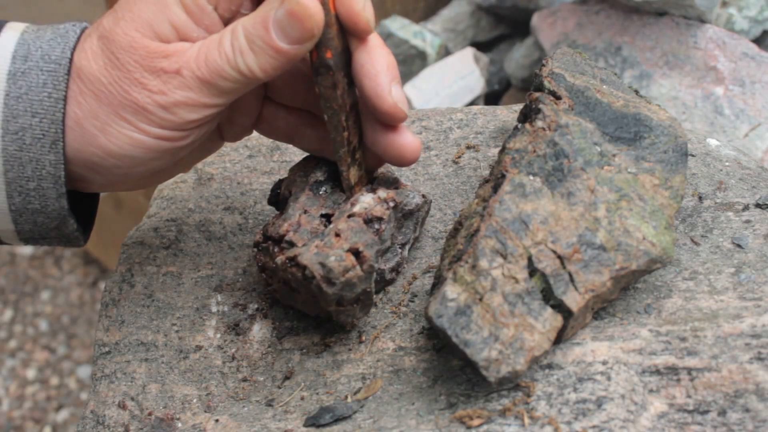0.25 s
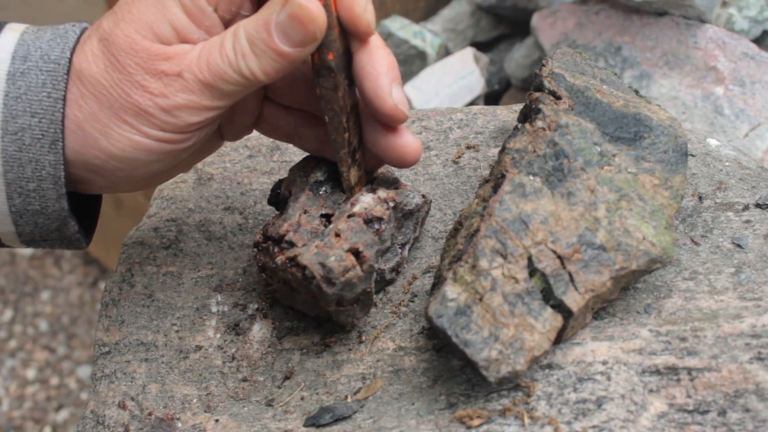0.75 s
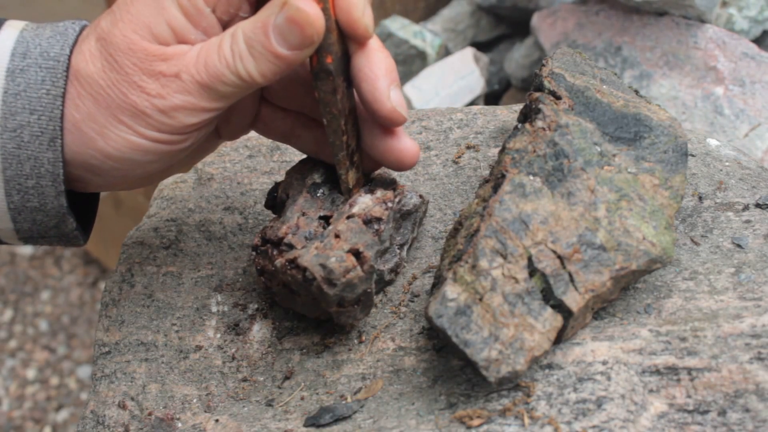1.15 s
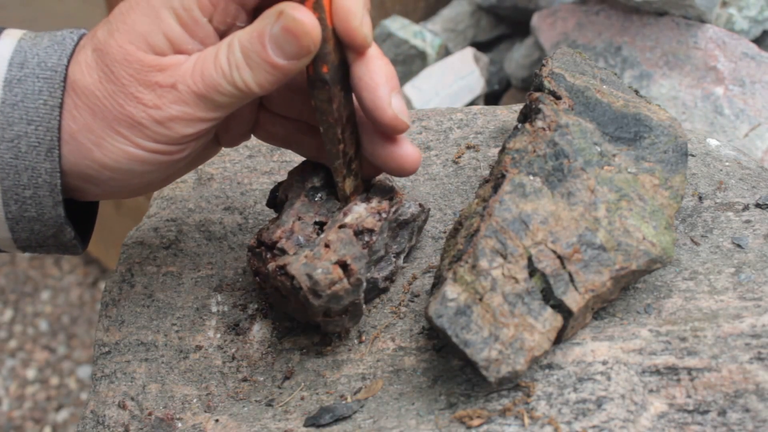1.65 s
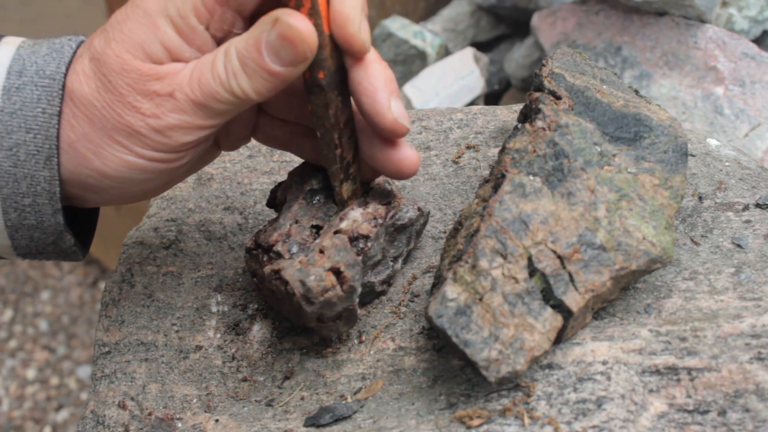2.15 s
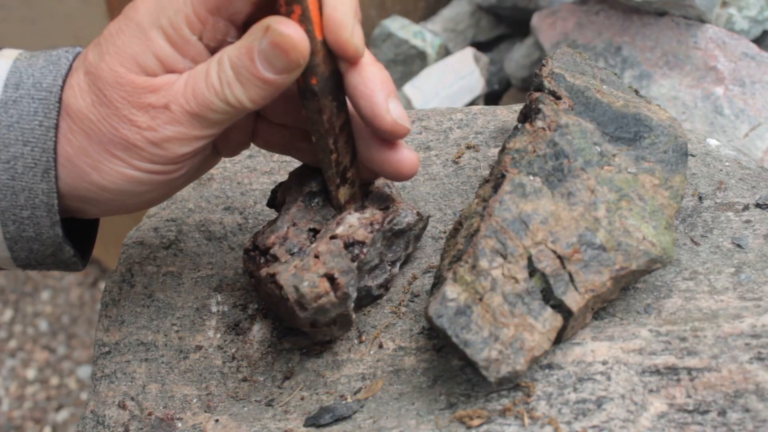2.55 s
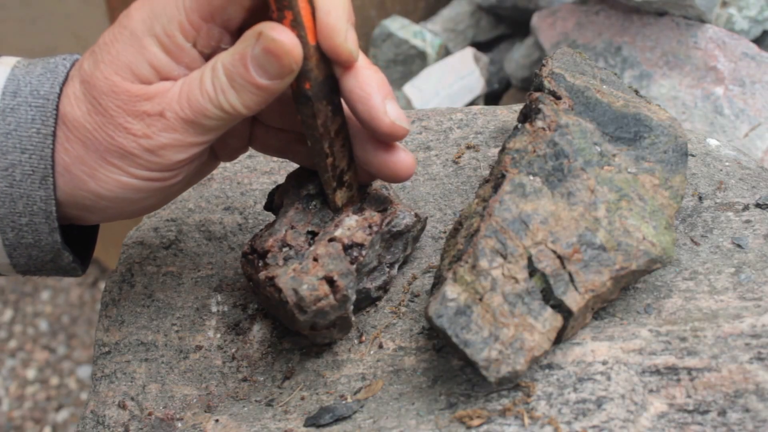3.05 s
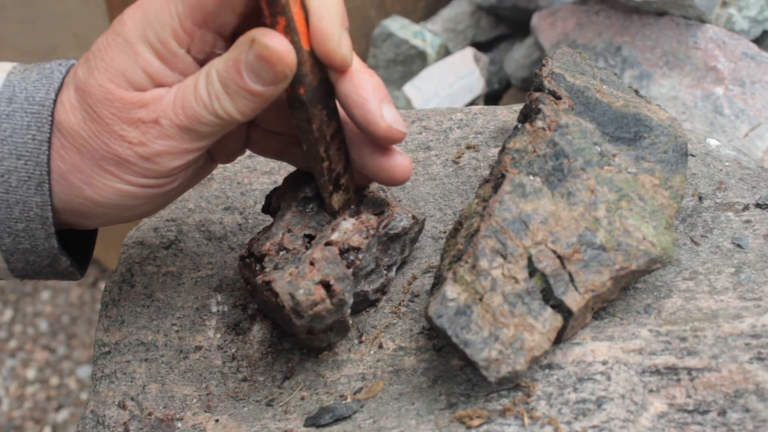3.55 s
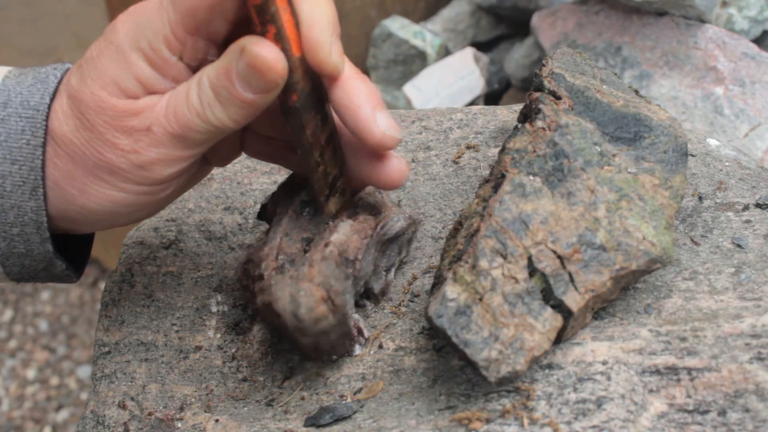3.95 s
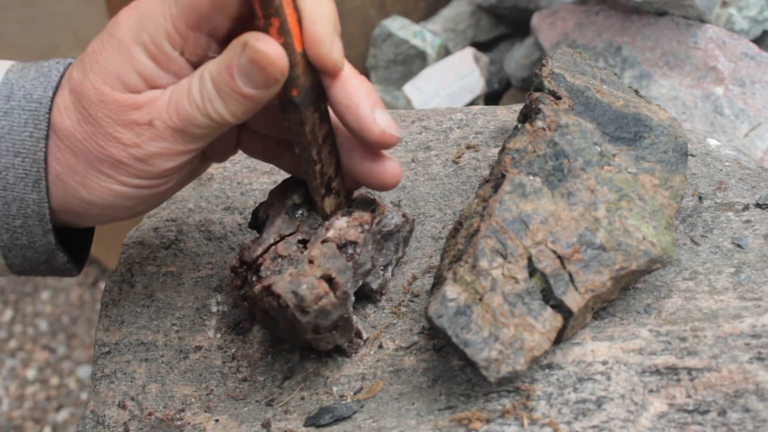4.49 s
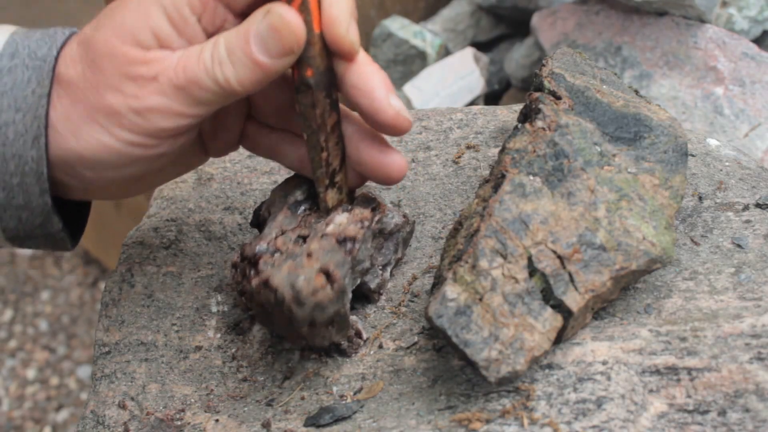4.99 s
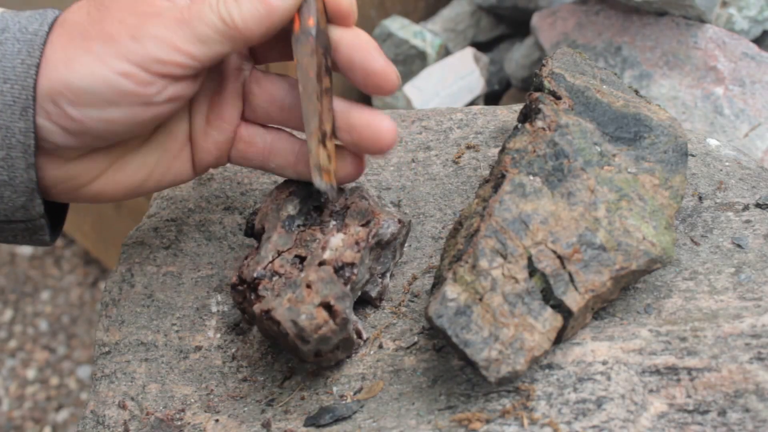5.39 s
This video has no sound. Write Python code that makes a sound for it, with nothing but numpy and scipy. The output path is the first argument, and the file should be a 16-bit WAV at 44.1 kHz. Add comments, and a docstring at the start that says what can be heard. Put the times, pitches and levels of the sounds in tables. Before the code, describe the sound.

Thirteen steady chisel blows crunch into a stone lump, sharp and clipped with short ringing, then the chisel scrapes free and the lump clacks down.

```python
"""Outdoors in a yard, close by: a hammer taps a hand-held steel chisel into a lump of rock on a stone slab.
Thirteen blows each crush stone (bursts of coloured noise and a knock) and ring steel and slab (dying sines).
The click and ring return as near echoes and a yard tail; the blows clip the level and grow mostly harder,
so gain control ducks the wavering noise of the open air further.
At the end the chisel squeaks out of its notch, the lump knocks on the slab and grit scrapes."""
import sys
import numpy as np
from scipy import signal
from scipy.fft import rfft, irfft
from scipy.io import wavfile
from scipy.ndimage import uniform_filter1d, minimum_filter1d, map_coordinates

SR = 44100
rng = np.random.default_rng(int(sys.argv[2]) if len(sys.argv) > 2 else 0)


def unload_audio(sound):
    """Save the sound as a 16-bit wav file, at the path given as the first command line argument."""
    columns = np.transpose(np.atleast_2d(sound))
    # keep every value between -1 and 1, then stretch to whole-number steps
    steps = np.round(np.clip(columns, -1, 1) * 32767)
    wavfile.write(sys.argv[1], SR, steps.astype(np.int16))


N = 248056
TIME = np.arange(N) / SR  # s, the whole scene
AGE = np.arange(SR // 2) / SR  # s since a sound began


def amp(db):
    """Decibels to gain."""
    return 10 ** (np.asarray(db) / 20)


def evened(x):
    """Scales to rms 1."""
    return x / np.sqrt(np.mean(x ** 2) + 1e-20)


def read(points, hz):
    """Reads a table along a log-frequency axis."""
    f, value = np.transpose(points)
    return np.interp(np.log(hz + 1), np.log(f + 1), value)


def add(mix, s, sound):
    """Mixes a sound in at time s."""
    part = mix[round(s * SR):][:len(sound)]
    part += sound[:len(part)]


def noise(colour_db, size):
    """Noise of rms 1 whose spectrum is the function colour_db of frequency."""
    hz = np.fft.rfftfreq(size, 1 / SR)
    spectrum = rfft(rng.standard_normal(size)) * amp(colour_db(hz))
    return evened(irfft(spectrum, size))


def band_noise(centre_hz, octaves, size=len(AGE)):
    """Noise of rms 1 in a band with soft shoulders, half a second unless a size is given."""
    def shoulders_db(hz):
        return -20 * np.log10(1 + (np.log2((hz + 1) / centre_hz) / octaves) ** 4)
    return noise(shoulders_db, size)


def hump(hz, centre_hz, octaves):
    """A bell, 1 at its centre, on a log-frequency axis."""
    return np.exp(-(np.log2((hz + 1) / centre_hz) / octaves) ** 2)


def swell(s, half_s):
    """A smooth rise and fall, 1 at time s."""
    return np.exp(-((TIME - s) / half_s) ** 2)


def air(level_db=-44, waver_db=1.06, waver_hz=7):
    """A steady outdoor wash: coloured noise whose level wavers a little and slowly."""
    # spectrum of the open air: f/Hz, relative level/dB
    air_colour = [(15, -36), (25, -8), (114, 2), (145, -6.5), (285, -8), (416, -8.5), (451, -7),
                  (818, -6.5), (962, -5.5), (1100, -8.5), (3820, -15), (16000, -36.5)]
    waver = noise(lambda hz: -20 * np.log10(1 + (hz / waver_hz) ** 2), N)
    wash = noise(lambda hz: read(air_colour, hz), N)
    return amp(level_db + waver_db * waver) * wash


def rustles(octaves=.45):
    """Soft swishes of skin and cloth: bands of noise that rise and fall smoothly."""
    # hand and sleeve shift: t/s at the loudest, level/dB, half length/s, centre f/Hz
    shifts = [(0.71, -47.5, .09, 3000), (5.314, -49, 0.35, 1570)]
    out = np.zeros(N)
    for s, db, half_s, centre_hz in shifts:
        out += amp(db) * swell(s, half_s) * band_noise(centre_hz, octaves, size=N)
    return out


def yard(x, build_s=0.0077, rubble_t60=0.16):
    """Scattered reflections: a short bright spray from the rubble, then the yard dying away band by band."""
    # energy of the yard's tail: f/Hz, level/dB
    yard_colour = [(100, -39), (400, -48.5), (1200, -52.5), (1800, -39.5), (2800, -34.5), (4000, -44.5),
                   (5500, -47), (7000, -54), (9500, -45), (11000, -64), (15500, -63.5)]
    # how long the yard takes to die by 60 dB: f/Hz, t60/s
    yard_decay = [(100, 0.23), (1000, 0.076), (3000, 0.74), (5000, 0.86), (8000, 0.1), (15000, 0.19)]
    # loose stones all round scatter the click early and brightly: f/Hz, level/dB
    rubble_colour = [(100, -52), (1200, -48.5), (2000, -36.5), (3000, -34.5), (5500, -39.5), (9500, -48),
                     (11500, -56), (15500, -58)]
    hz, t, bands = signal.stft(rng.standard_normal(SR), SR, nperseg=256)
    yard_t60 = read(yard_decay, hz)[:, None]
    far = amp(read(yard_colour, hz)[:, None] - 60 * t / yard_t60) / np.sqrt(yard_t60)
    near = amp(read(rubble_colour, hz)[:, None] - 60 * t / rubble_t60) / np.sqrt(rubble_t60)
    # with the t60 roots above, a long tail carries no more energy than a short one of equal level
    bands = bands * np.hypot(near, far) * np.sqrt(2 * np.log(1000) / SR)
    build_up = 1 - np.exp(-np.arange(SR) / SR / build_s)
    tail = signal.istft(bands, SR, nperseg=256)[1][:SR] * build_up
    return signal.fftconvolve(x, tail)[:N]


def near_echoes(x, low_hz=600, dull_hz=4800):
    """Rocks and walls close by throw back single, duller copies."""
    # near surfaces: delay/s, level/dB
    surfaces = [(.0103, -23), (.0111, -30), (.0194, -37), (.0250, -43), (.0368, -39), (.0490, -40)]
    taps = np.zeros(len(AGE))
    for delay, db in surfaces:
        taps[round(delay * SR)] = amp(db)
    band = signal.butter(2, [low_hz, dull_hz], "band", fs=SR, output="sos")
    return signal.fftconvolve(signal.sosfilt(band, x), taps)[:N]


def scrape(grain_db=5, attack_s=0.01):
    """Grit rolls between steel and stone in clumps of tiny grains; each shift starts quickly and dies away."""
    # the tip and the lump grate on grit: t/s at the loudest, level/dB, decay/s
    shifts = [(5.11, -46, .025), (5.502, -36, 0.036), (5.586, -33, 0.017)]
    # spectrum of the grit: f/Hz, relative level/dB per Hz
    grit_colour = [(60, -2.5), (300, 10), (700, -3), (2500, 1), (5000, -7), (9000, -17), (16000, -18)]
    clumps = evened(uniform_filter1d(rng.standard_normal(N), size=70))
    level = np.zeros(N)
    for s, db, decay_s in shifts:
        level += amp(db) * np.exp(-np.maximum((s - TIME) / attack_s, (TIME - s) / decay_s))
    grit = noise(lambda hz: read(grit_colour, hz), N)
    return level * grit * evened(amp(grain_db * clumps))


def squeak(start=5.066, length=0.092, width_hz=55, gain_db=18, glide=0.03):
    """The tip slides out of its notch; uneven slips excite narrow resonances that sink a little in pitch."""
    # the tip dragged over stone: f/Hz, level/dB before the gain
    resonances = [(2573, -61.5), (4425, -57), (6535, -65), (7790, -68), (11946, -64), (12339, -59)]
    size = int(length * SR)
    lines = np.zeros(size)
    for f, db in resonances:
        lines += amp(db) * noise(lambda hz: -20 * np.log10(1 + ((hz - f) / width_hz) ** 2), size)
    # reading ever more slowly makes the pitch sink
    place = np.cumsum(1 + glide * np.linspace(.5, -.5, size))
    sinking = map_coordinates(lines, [place], order=5)
    out = np.zeros(N)
    add(out, start, amp(gain_db) * sinking * np.hanning(size))
    return out


def knocks(octaves=1.02, clack_s=0.0036, bump_db=-9, bump_hz=298, bump_octaves=0.31, bump_s=0.0046):
    """Stone meets stone: a short clack over a dull bump of the slab, both dying bands of noise."""
    # the loosened lump drops back on the slab and rocks: t/s, level/dB, centre f/Hz
    drops = [(5.4954, -10, 3930), (5.5156, -25, 2220), (5.5619, -29, 5460)]
    out = np.zeros(N)
    for s, db, centre_hz in drops:
        clack = band_noise(centre_hz, octaves) * np.exp(-AGE / clack_s)
        bump = amp(bump_db) * band_noise(bump_hz, bump_octaves) * np.exp(-AGE / bump_s)
        add(out, s, amp(db) * (clack + bump))
    return out


def chips(centre_hz=10500, octaves=1.0, decay_s=0.00095):
    """Tiny chips of stone click: dry, bright snaps of noise that die at once."""
    # clicks: t/s, level/dB
    clicks = [(0.8107, -31.5), (1.0378, -35), (3.481, -21.5), (5.169, -28), (5.441, -22)]
    out = np.zeros(N)
    for s, db in clicks:
        add(out, s, amp(db) * band_noise(centre_hz, octaves) * np.exp(-AGE / decay_s))
    return out


def rebounds(centre_hz=2300, octaves=.6, tick_db=-9, tick_octaves=1.5, touch_s=.001):
    """Light, dry second touches of the hammer: a small knock with a thin, wide tick."""
    # the hammer falls back on the chisel: t/s, level/dB
    touches = [(1.6620, -8.5), (2.685, -6), (3.0300, 1), (3.3787, -4.5)]
    out = np.zeros(N)
    pulse = AGE / touch_s * np.exp(1 - AGE / touch_s)
    for s, db in touches:
        touch = band_noise(centre_hz, octaves) + amp(tick_db) * band_noise(centre_hz, tick_octaves)
        add(out, s, amp(db) * touch * pulse)
    return out


def ring(modes, shift=1):
    """A struck body: dying sines in random phase, one a mode; shift scales their pitch."""
    hz, db, t60 = np.transpose(modes)[:, :, None]
    sines = np.sin(2 * np.pi * (shift * hz * AGE + rng.random(hz.shape)))
    return (amp(db - 60 * AGE / t60) * sines).sum(0)


def crush(knock_hz, body_db, bright_db, crack_db=3, grind_db=-2, knock_db=4, body_base_db=-12,
          crumble_db=-13, swell_s=0.0014, contact_s=0.0034):
    """The tip bites: a bright crack, then stone grinds and knocks until the contact ends and it crumbles."""
    # spectrum of stone being crushed: f/Hz, relative level/dB per Hz
    grind_colour = [(30, -30.5), (300, -26.5), (750, -23), (1500, -3), (2500, 6), (4000, 5.5), (6500, -9),
                    (9000, -9), (12000, -24), (16000, -16.5)]
    contact = 1 / (1 + (AGE / contact_s) ** 10)
    crumble = amp(crumble_db) * np.exp(-AGE / 0.0088)
    crack = noise(lambda hz: 50 * hump(hz, 5800, 1.5), len(AGE)) * np.exp(-AGE / 0.0013)
    grind = noise(lambda hz: read(grind_colour, hz), len(AGE)) * (contact + crumble)
    body = noise(lambda hz: 50 * hump(hz, 1700, 2.0), len(AGE)) * (contact + crumble)
    knock = np.sin(2 * np.pi * knock_hz * AGE) * contact * (1 - np.exp(-AGE / swell_s))
    bite = amp(crack_db + bright_db) * crack + amp(grind_db) * grind
    return bite + amp(body_base_db + body_db) * body + amp(knock_db) * knock


def hammering(bright_db=3.5, body_db=0, push_s=0.00038, boom_db=7, sing_db=0, click_db=42,
              ring_send_db=-3, stone_send_db=-6, rise_s=.00008):
    """Blows crush rock and ring steel and slab; returns the direct sound and what spreads into the yard."""
    # one row a blow: t/s, force/dB, knock of the rock f/Hz, then relative to the force:
    # chisel ring/dB, sideways ring/dB, slab thud/dB, low push/dB
    blows = [(0.4463, -3.5, 1966, -9, -27.5, -16, -20), (0.9067, 6, 2017, 0.5, -3, -13.5, -21.5),
             (1.2741, 7, 2940, -3, -11.5, -9, -25.5), (1.6308, 8.5, 2448, -19.5, -15.5, -7.5, -13.5),
             (1.9812, 8, 2472, -13.5, -22.5, -9, -10), (2.318, 11, 2467, -13.5, -13, -17.5, -6.5),
             (2.6599, 13, 2449, -12, -12.5, -17.5, -8.5), (2.9938, 14.5, 3843, -6.5, -27.5, -18.5, -19),
             (3.331, 16, 2299, -3.5, -31, -20.5, -13.5), (3.6887, 17.5, 2550, -6, -22.5, -24, -23.5),
             (4.0536, 17, 2501, -6.5, -8.5, -27, -29.5), (4.4117, 16.5, 2507, -18.5, -30.5, -20, -26.5),
             (4.7745, 16.5, 2448, -3.5, -22.5, -15, -27.5)]
    # modes of each struck body: f/Hz, relative level/dB, t60/s
    # the chisel
    chisel_modes = [(5033, 0, .056), (6600, -28, .04), (9250, -35, .08), (12100, -38, .07),
                    (15570, -28, .05)]
    # the chisel's ways of bending that the grip damps quickly
    side_modes = [(3836, 0, 0.034), (5070, -12.5, 0.023)]
    # a thin trace of the chisel's ring that lingers
    sing_modes = [(5033, -50, 1.0)]
    # the stone slab
    slab_modes = [(429, -7, .068), (345, -20, .04)]
    # the heavy support under the slab, booming faintly
    base_modes = [(63, -64.5, 0.64), (91, -56, 0.39), (117, -62, 0.14)]
    # the lump of rock
    rock_modes = [(1450, -16, .007), (1900, -10, .008), (2680, -13, .011), (3000, -11, .009),
                  (4150, -10, .008), (4600, -13, .007)]
    # the harder the blow, the more of it goes into the crack and the support, the less into the rock's body
    usual_force_db, bright_per_db, body_per_db, support_per_db = 12, 1.04, -0.91, 0.23
    direct, sent = np.zeros(N), np.zeros(N)
    rise = 1 - np.exp(-AGE / rise_s)
    push = AGE / push_s * np.exp(1 - AGE / push_s)  # the slab gives way once under the blow
    for s, force_db, knock_hz, ring_db, side_db, thud_db, push_db in blows:
        harder_db = force_db - usual_force_db
        seat = rng.uniform(.95, 1.05)  # the lump sits a little differently under every blow
        crushed = crush(knock_hz, body_db + body_per_db * harder_db, bright_db + bright_per_db * harder_db)
        stone = crushed + ring(rock_modes, seat)
        steel = amp(ring_db) * ring(chisel_modes)
        sides = amp(side_db) * ring(side_modes)
        sing = amp(sing_db + ring_db / 2) * ring(sing_modes)
        slab = amp(thud_db) * ring(slab_modes) + amp(push_db) * push
        support = amp(boom_db + support_per_db * harder_db) * ring(base_modes, seat)
        add(direct, s, amp(force_db) * rise * (stone + steel + sides + sing + slab + support))
        add(sent, s, amp(force_db) * (amp(ring_send_db) * steel + amp(stone_send_db) * stone))
        add(sent, s, amp([force_db + click_db]))  # click of steel on steel, one sample long
    return direct, sent


def gain_control(x, ceiling_db=-3, attack_s=.006, hold_s=0.25, recover_db_per_s=42):
    """Turns down by what passes the ceiling, too late for the crack itself; holds, then comes back up."""
    power = uniform_filter1d(x[0] ** 2, size=221, origin=110)  # mean over the last 5 ms
    over_db = np.maximum(10 * np.log10(abs(power) + 1e-12) - ceiling_db, 0)
    half = int(hold_s * SR / 2)
    held_db = -minimum_filter1d(-over_db, 2 * half + 1, origin=half)
    # a running maximum on a rising ramp lets the reduction fall no faster than the ramp
    recovery_db = recover_db_per_s * TIME
    down_db = np.maximum.accumulate(held_db + recovery_db) - recovery_db
    lag = np.exp(-1 / (attack_s * SR))
    return x * amp(-signal.lfilter([1 - lag], [1, -lag], down_db))


def scene():
    """Blows, small stone sounds, their echoes and the open air."""
    direct, sent = hammering()
    small = rebounds() + chips() + knocks() + squeak() + scrape()
    reflected = near_echoes(direct + small) + yard(sent + small)
    return (direct + small + reflected + rustles() + air())[None]


def record(dry, low_cut_hz=42, hiss_db=-81, edge_hz=15950):
    """Gain control ducks the air, hiss joins, peaks clip; then a gentle low cut, a band limit and full scale."""
    levelled = gain_control(dry) + amp(hiss_db) * rng.standard_normal(N)
    low_cut = signal.butter(1, low_cut_hz, "high", fs=SR, output="sos")
    clipped = signal.sosfilt(low_cut, np.clip(levelled, -1, 1))
    band_limit = signal.firwin(255, edge_hz, window=("kaiser", 7), fs=SR)
    limited = signal.oaconvolve(clipped, band_limit[None], "same")
    return np.clip(limited, -1, 1)


dry = scene()
out = record(dry)
unload_audio(out)
```